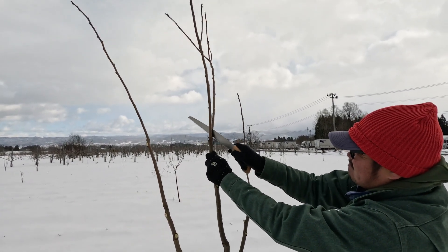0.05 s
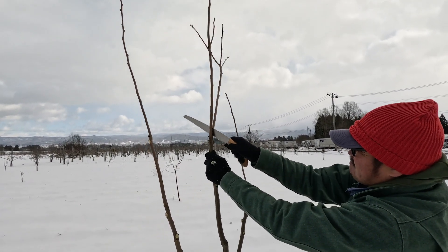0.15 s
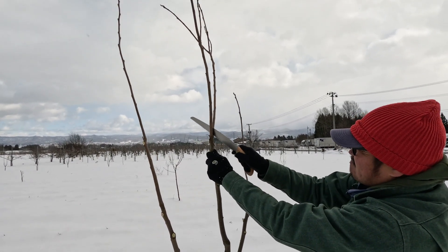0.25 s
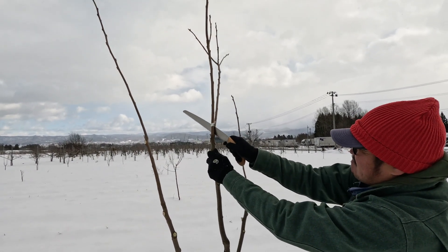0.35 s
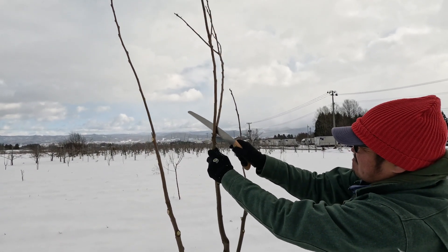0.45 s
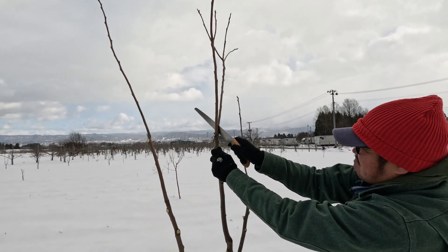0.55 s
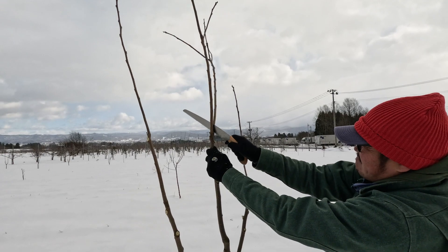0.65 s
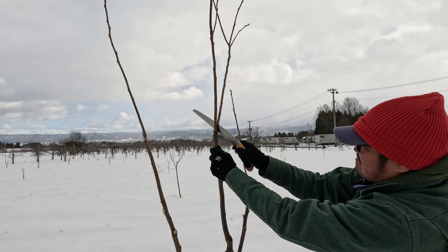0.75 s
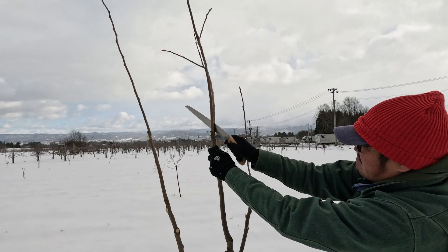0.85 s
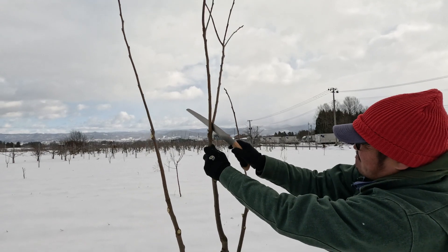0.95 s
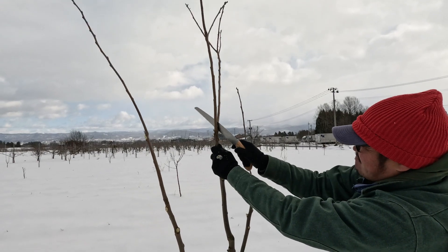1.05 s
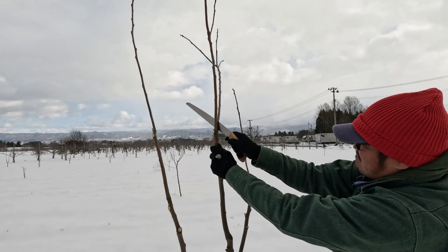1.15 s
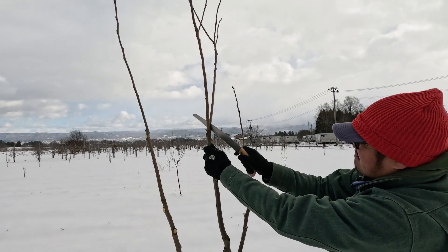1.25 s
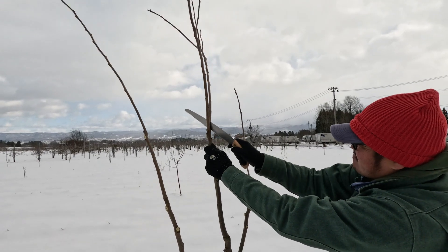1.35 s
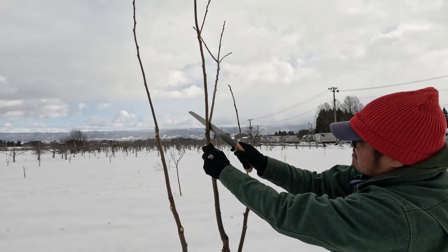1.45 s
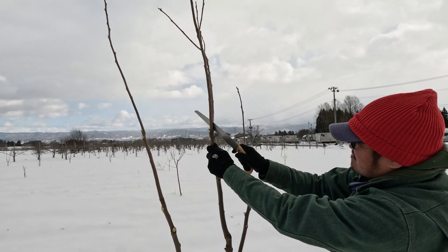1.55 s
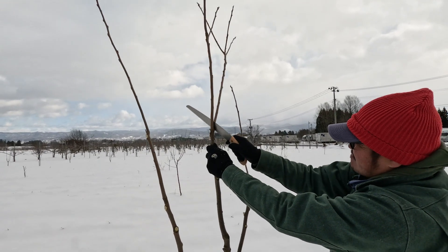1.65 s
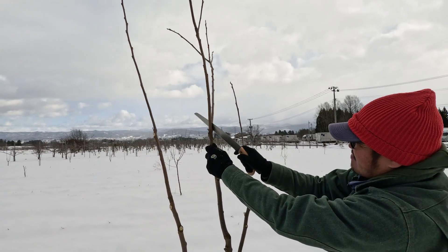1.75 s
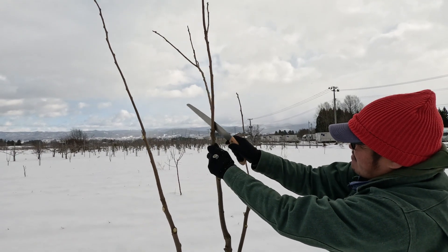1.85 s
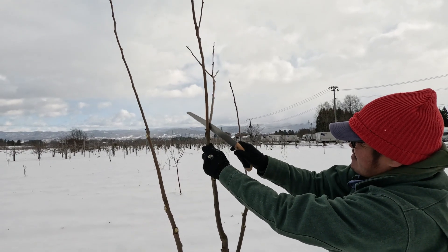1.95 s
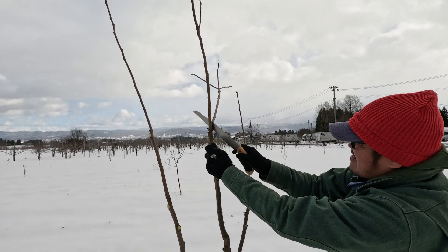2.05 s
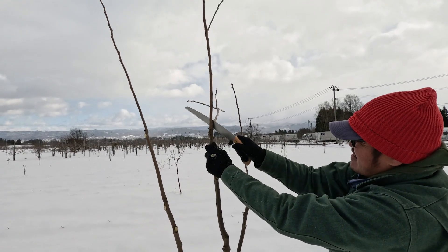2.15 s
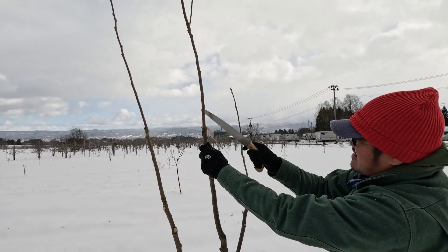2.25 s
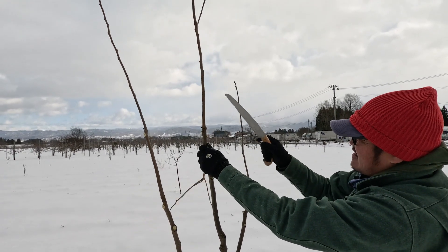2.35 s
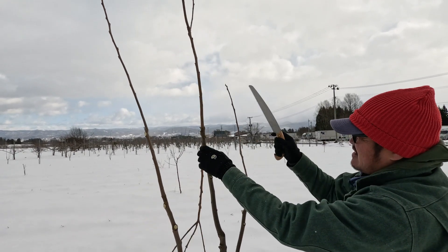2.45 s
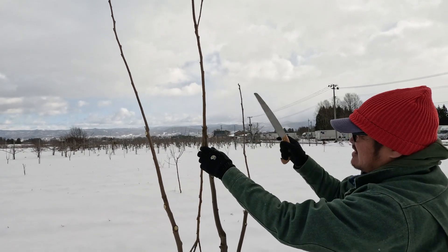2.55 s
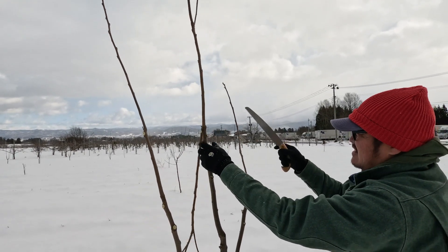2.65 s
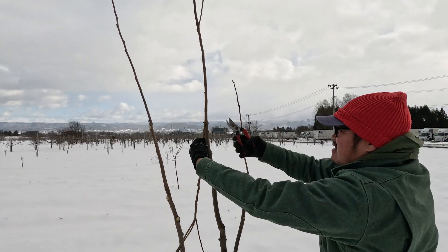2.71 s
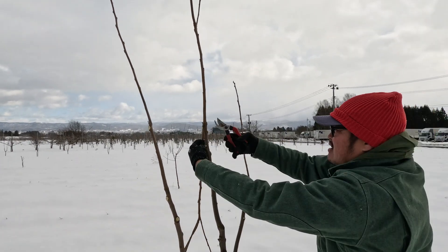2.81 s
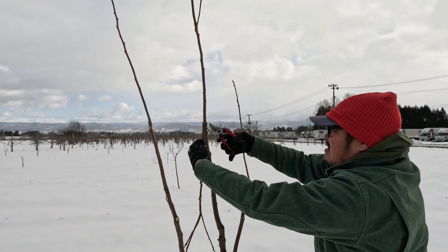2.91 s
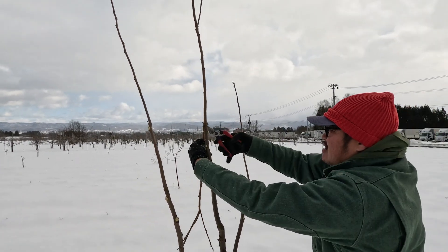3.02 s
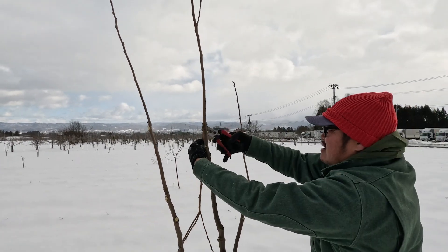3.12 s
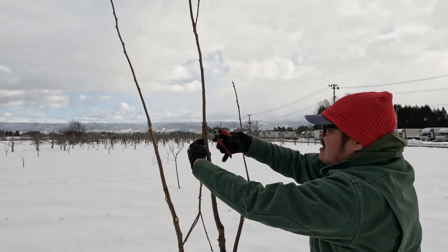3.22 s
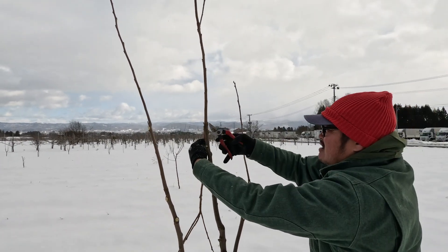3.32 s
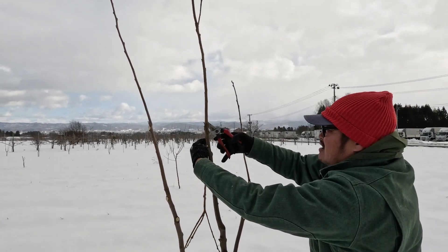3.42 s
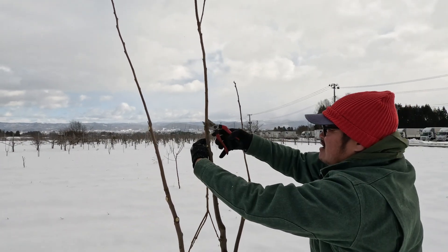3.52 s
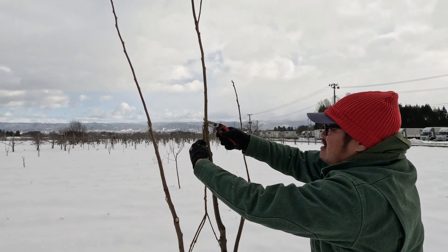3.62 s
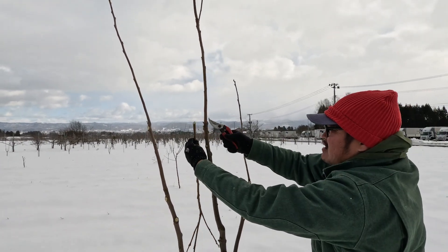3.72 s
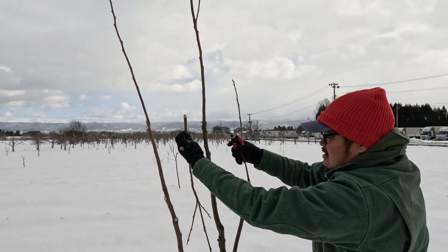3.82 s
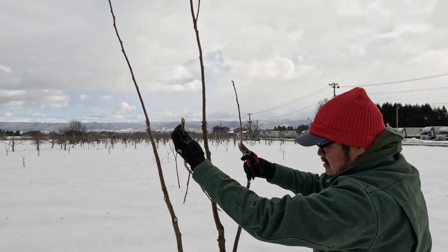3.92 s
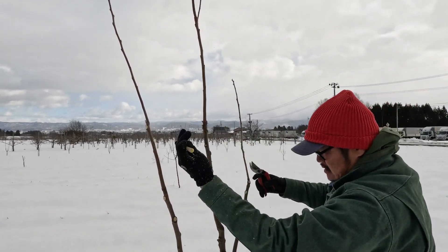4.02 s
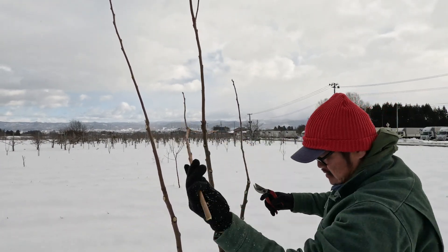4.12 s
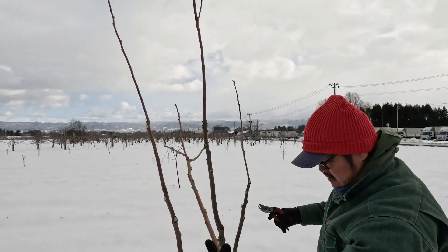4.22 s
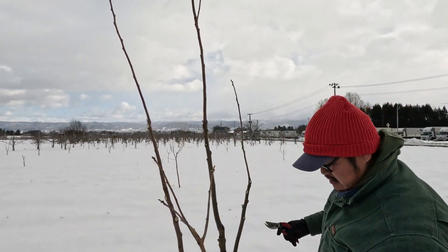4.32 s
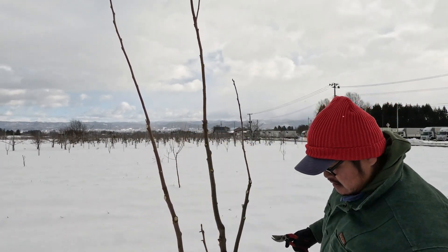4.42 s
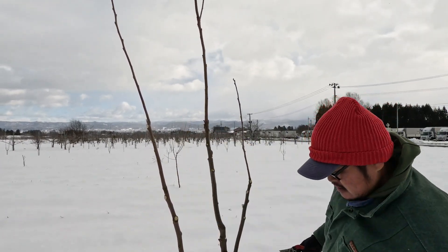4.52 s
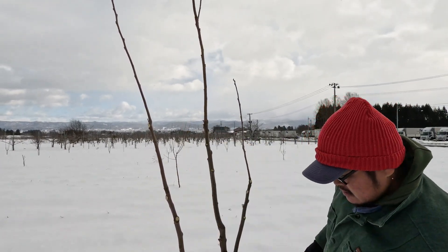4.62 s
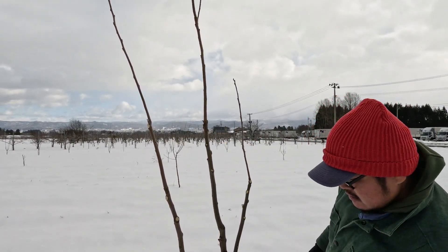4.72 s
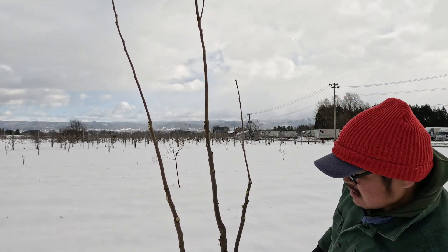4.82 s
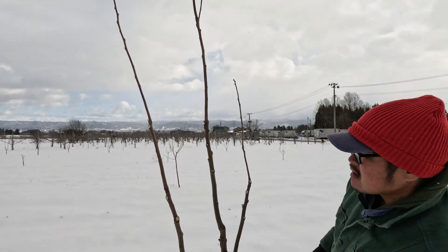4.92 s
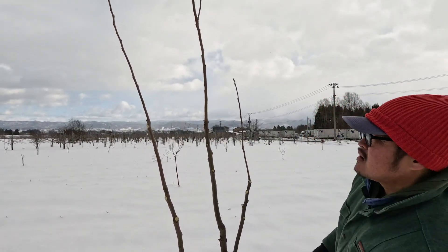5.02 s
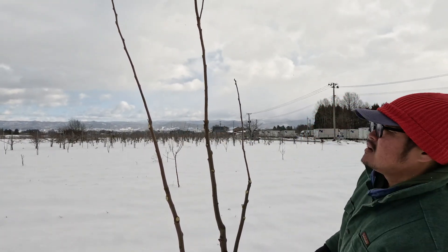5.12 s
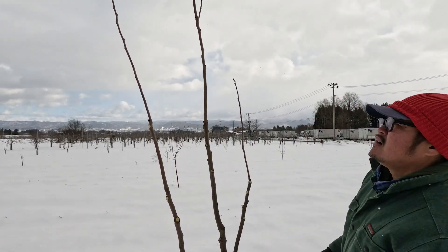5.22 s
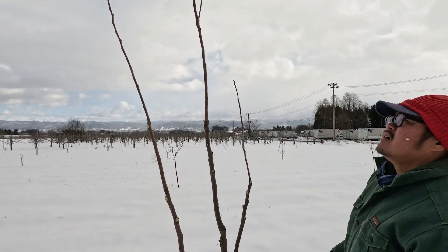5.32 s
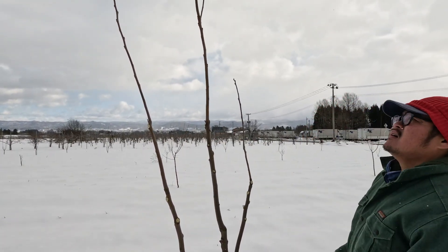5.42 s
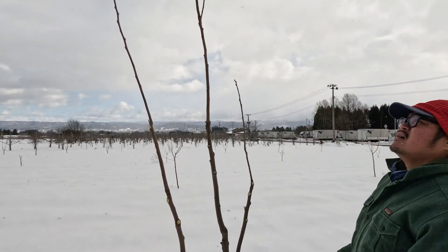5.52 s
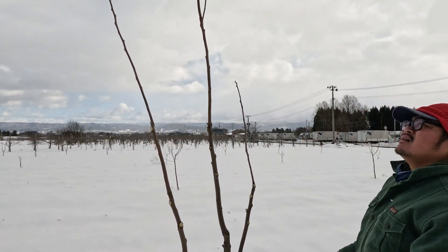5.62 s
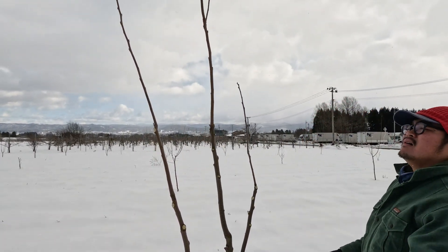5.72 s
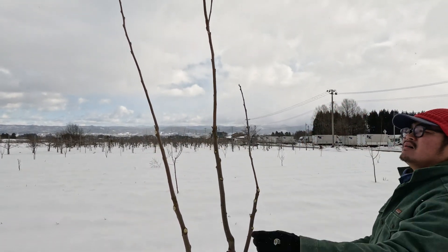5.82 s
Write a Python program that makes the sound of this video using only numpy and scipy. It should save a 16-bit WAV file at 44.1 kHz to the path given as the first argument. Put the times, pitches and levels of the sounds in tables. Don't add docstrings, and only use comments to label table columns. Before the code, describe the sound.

Outdoors on a snowy field, a folding saw cuts a thin branch close to the microphone, eight rasping strokes a second, with small steel rings and low stem shudder. After it stops, a stiff jacket rustles softly, a very sharp twig crack sounds, then smaller snaps. Snow crunches and faintly creaks at the end. Low wind buffets the microphone over far traffic.

```python
import sys
import numpy as np
from scipy import signal
from scipy.io import wavfile
from scipy.ndimage import uniform_filter1d

SR = 44100
rng = np.random.default_rng(int(sys.argv[2]) if len(sys.argv) > 2 else 0)


def store_pcm(level_fs):
    pcm = np.round(np.clip(level_fs, -1, 1) * 32767).astype(np.int16)
    wavfile.write(sys.argv[1], SR, np.atleast_2d(pcm).T)


def gain_from_db(level_db):
    decades = np.asarray(level_db, float) / 20
    return 10 ** decades


N = 258409
T = np.arange(N) / SR


def evened(x):
    return x / np.sqrt(np.mean(x ** 2) + 1e-20)


def curve(rows):
    s, *columns = np.transpose(rows)
    return [np.interp(T, s, column) for column in columns]


def read(points, hz):
    f, value = np.transpose(points)
    return np.interp(np.log(hz + 1), np.log(f + 1), value)


def colour(x, points):
    hz = np.fft.rfftfreq(4096, 1 / SR) + 1
    below = np.maximum(points[0][0] / hz, 1)
    above = np.maximum(hz / points[-1][0], 1)
    db = read(points, hz) - 18 * np.log2(below * above ** 3)
    log = np.log(gain_from_db(np.maximum(db, -100)))
    log = np.r_[log, log[-2:0:-1]]
    taps = np.fft.ifft(np.exp(log - 1j * signal.hilbert(log).imag)).real[:2048]
    taps = (taps / np.linalg.norm(taps)).reshape((1,) * (x.ndim - 1) + (-1,))
    return signal.oaconvolve(x, taps, axes=-1)[..., :N]


def ring(x, hz, width):
    r = np.exp(-np.pi * width / SR)
    return 2 * signal.lfilter([1 - r], [1, -r * np.exp(2j * np.pi * hz / SR)], x).real


def resonate(x, hz, width):
    turn = np.exp(2j * np.pi * np.cumsum(hz * np.ones(N)) / SR)
    r = np.exp(-np.pi * width / SR)
    return 2 * (turn * signal.lfilter([1 - r], [1, -r], x / turn)).real


def drift(seconds):
    size = max(round(seconds * SR), 1)
    return evened(uniform_filter1d(uniform_filter1d(rng.standard_normal(N), size), size))


def grit(per_s, spread_db):
    size = gain_from_db(spread_db * np.minimum(rng.exponential(1, N), 4)) * rng.standard_normal(N)
    return evened(size * (rng.random(N) < per_s / SR))


def steadied(x, seconds):
    return x / np.sqrt(uniform_filter1d(x ** 2, max(round(seconds * SR), 2)) + 1e-12)


def mottled(x, patchy_db):
    z = signal.stft(x, nperseg=256)[2]
    patches = uniform_filter1d(rng.standard_normal(z.shape), 2, 0)
    patches = evened(uniform_filter1d(patches, 12, 1))
    return evened(signal.istft(z * gain_from_db(patchy_db * patches), nperseg=256)[1][:N])


def bumps(s, db, rise, fall):
    coarse = T[::32]
    late = coarse - s[:, None]
    shape = np.exp(-(late / np.where(late < 0, rise, fall)) ** 2)
    power = (gain_from_db(db)[:, None] ** 2 * shape).sum(0)
    return np.interp(T, coarse, np.sqrt(power))


def swells(rows, rest_db):
    s, db, half = np.transpose(rows)
    return np.hypot(gain_from_db(rest_db), bumps(s, db, half[:, None], half[:, None]))


def pair(x, other_db, seconds):
    side = gain_from_db(other_db) * x * drift(seconds)
    return np.array([x + side, x - side])


# (frequency [Hz], likeness [0-1])
LIKENESS = [(60, 0.81), (170, 0.92), (500, 0.71), (1440, 0.49), (4140, 0.61), (11900, 1)]


def spread(points, patchy_db, flicker_db):
    frames, hz = N // 128 + 5, np.fft.rfftfreq(512, 1 / SR)
    a, b, c, d, patches = rng.standard_normal((frames, 257, 5)).T
    patches = evened(uniform_filter1d(uniform_filter1d(patches, 6, 0), 20, 1))
    flicker = evened(uniform_filter1d(rng.standard_normal(frames), 4))
    same = np.clip(read(LIKENESS, hz), -1, 1)[:, None]
    left = a + 1j * b
    right = same * left + np.sqrt(1 - same ** 2) * (c + 1j * d)
    z = np.array([left, right]) * gain_from_db(patchy_db * patches + flicker_db * flicker)
    noise = signal.istft(z, nperseg=512, noverlap=384)[1][:, :N]
    return evened(colour(noise, points))


# (frequency [Hz], level per Hz [dB])
ROAD_TONE = [(24, -35.5), (40, 1), (118, -15), (295, -9), (429, -30.5), (583, -21.5), (810, -32),
             (1050, -21.5), (1270, -29.5), (2690, -74), (7040, -36.5), (8900, -44.5), (11000, -93.5),
             (14300, -107), (22000, -120)]


def road():
    return gain_from_db(-54.5) * spread(ROAD_TONE, 1.7, 0.34)


# (time [s], level [dB])
WIND_PRESSURE = [(0.0, -46.5), (0.88, -42.5), (1.03, -47.5), (1.22, -40), (1.89, -49), (1.97, -50),
                 (3.16, -47.5), (3.41, -42), (3.54, -46), (3.74, -37), (4.31, -40.5), (4.49, -47),
                 (4.54, -37.5), (4.88, -47), (4.99, -37), (5.24, -55.5), (5.58, -37), (5.86, -38.5)]
# (time [s], level [dB], half length [s])
EDDIES = [(0.0, -53, 0.015), (0.55, -63, 0.046), (0.92, -55.5, .12), (1.33, -51, 0.075),
          (1.65, -47.5, 0.24), (3.28, -53, 0.08), (3.57, -52.5, 0.1), (3.78, -47, 0.054),
          (4.48, -50.5, 0.11), (4.86, -52.5, 0.15), (5.23, -50, 0.14), (5.67, -44, 0.051),
          (5.8, -43.5, 0.054)]
# (time [s], level [dB], frequency [Hz])
GUST_THUMPS = [(4.289, -31.5, 49), (4.528, -36, 59), (5.23, -39, 200), (5.565, -33, 14.5),
               (5.602, -28, 122), (5.609, -26, 56), (5.639, -32, 47), (5.678, -35, 104), (5.75, -30.5, 86),
               (5.791, -38, 38), (5.809, -29.5, 55), (3.738, -26, 180)]


def wind():
    buffet_db, = curve(WIND_PRESSURE)
    buffet = spread([(8, -7.5), (22, 11), (40, -5.0), (70, -25.5)], 0, 0.97)
    buffet = gain_from_db(buffet_db) * buffet * gain_from_db([[-1.2], [1.2]])
    flutter = spread([(45, -3.5), (70, -4), (140, -8.0), (320, -15.0), (700, -25.0)], 3.9, 1.1)
    flutter = swells(EDDIES, -73.5) * flutter
    thumps = np.zeros(N)
    for s, db, hz in GUST_THUMPS:
        late = T - s
        thumps += gain_from_db(db) * np.sin(2 * np.pi * hz * late) * np.exp(-(late * hz - .5) ** 2 * 3)
    return buffet + flutter + thumps


# (time [s], level [dB])
SLEEVE_MOVES = [
    (0, -51),
    (.5, -51.5),
    (.6, -61.5),
    (.75, -55.5),
    (1.15, -61),
    (1.25, -52),
    (2.3, -51.5),
]
# (time [s], level [dB])
JACKET_MOVES = [(2.3, -42), (2.34, -70), (2.47, -59.5), (2.72, -67.5), (2.89, -62), (3.1, -69.5),
                (3.41, -73), (3.62, -79), (3.78, -85.5), (4.04, -57), (4.6, -58), (4.72, -70.5), (4.9, -61),
                (5.14, -56.5), (5.44, -55.5), (5.48, -66), (5.68, -63.5), (5.78, -64.5)]
# (frequency [Hz], level per Hz [dB])
CLOTH_TONE = [(880, -13.5), (1500, -2), (2480, -4), (3810, -4.5), (5440, -5), (8620, -15.5), (9910, -12),
              (11200, -40.5), (12000, -36.5), (15600, -70), (22000, -120)]


def jacket():
    sleeve_db, = curve(SLEEVE_MOVES)
    jacket_db, = curve(JACKET_MOVES)
    move_db = np.where(T < JACKET_MOVES[0][0], sleeve_db, jacket_db)
    return gain_from_db(move_db) * spread(CLOTH_TONE, 1.6, 1.2)


# (time [s], level [dB], half length [s])
WEIGHT_SHIFTS = [(2.33, -60, 0.079), (2.85, -60, 0.13), (3.28, -60, 0.3), (3.62, -61, 0.12),
                 (4.2, -59, 0.39), (4.55, -56.5, 0.14), (4.87, -59, 0.16), (5.13, -54, 0.14),
                 (5.28, -49.5, 0.085), (5.45, -56, 0.39), (5.79, -51, 0.086)]
# (frequency [Hz], level per Hz [dB])
SNOW_TONE = [(190, -21), (330, 4.5), (399, -3), (604, 0), (846, -6.5), (1220, 0), (1430, -5), (1660, -5.5),
             (2600, -28.5), (3380, -76), (5720, -120)]


def snow():
    return swells(WEIGHT_SHIFTS, -67) * gain_from_db(-1.5) * spread(SNOW_TONE, 2.1, 1.2)


# (time [s], length [s], bite level [dB], place of hardest bite [0-1], blade shimmer against bite [dB])
SAW_STROKES = [(0.011, 0.11, -32, 0.56, -52), (0.153, 0.11, -31.5, 0.49, -15),
               (0.274, 0.11, -33.5, .36, -48.5), (0.417, 0.091, -33, 0.31, -20),
               (0.52, 0.046, -34, 0.7, -18), (0.671, 0.065, -37, 0.58, -24),
               (0.768, 0.074, -32.5, 0.58, -35), (0.931, 0.082, -33.5, 0.52, -19.5),
               (1.04, 0.066, -33.5, .48, -38.5), (1.184, 0.12, -35.5, 0.33, -7),
               (1.302, 0.089, -28.5, 0.54, -16), (1.431, 0.098, -34.5, 0.58, -12.5),
               (1.55, 0.11, -35.5, .48, -24), (1.661, 0.12, -35.5, 0.4, -7), (1.788, 0.1, -30.5, 0.47, -47),
               (1.908, 0.11, -31, 0.43, -7.5), (2.029, 0.11, -30, .56, -22.5),
               (2.148, 0.13, -37.5, 0.65, -45), (2.277, 0.041, -36, 0.65, -41)]


def strokes():
    drag_db = -69
    arch_db = 52
    land_db, lift_db = 17, 19
    bite = np.full(N, gain_from_db(drag_db)) * (T < SAW_STROKES[-1][0])
    for s, length, db, top, _ in SAW_STROKES:
        way = (T - s) / length
        ends_db = np.interp(way, [-.03, .14, .86, 1.04], [land_db, 0, 0, lift_db])
        arch = arch_db * (np.clip(way, .14, .86) - top) ** 2
        bite += gain_from_db(db - arch - ends_db) * (way > -.03) * (way < 1.04)
    return bite


# (time [s], bite level [dB], fall [s])
TOOTH_GRABS = [(.032, -41.5, .012), (.143, -45.5, 0.0049), (0.175, -35, .015), (0.199, -33.5, 0.0047),
               (0.321, -34, 0.0042), (.375, -40.5, 0.014), (0.421, -32.5, 0.0055), (.443, -32.5, 0.0059),
               (.47, -35.5, 0.013), (.558, -33, 0.0065), (0.576, -46, .012), (.685, -42, .01),
               (.713, -35, 0.0065), (0.768, -45, 0.0083), (0.804, -35, 0.0044), (.84, -38.5, .012),
               (0.931, -46, 0.0039), (.947, -39, 0.0064), (1.047, -39, 0.0097), (1.089, -34, 0.0072),
               (1.161, -46, 0.0048), (1.178, -46.5, 0.0056), (1.197, -39, 0.0077), (1.307, -39.5, .01),
               (1.329, -33, 0.0064), (1.351, -26, 0.0054), (1.401, -46.5, .012), (1.569, -41, 0.0099),
               (1.668, -40, .006), (1.792, -41.5, 0.0096), (1.86, -29, 0.0049), (1.918, -39, 0.011),
               (1.95, -31.5, 0.0063), (2.034, -42, 0.011), (2.103, -27.5, 0.0063), (2.185, -36.5, 0.0081),
               (2.255, -36.5, 0.0058), (2.299, -34.5, 0.0053), (2.313, -35.5, 0.009), (2.334, -52.5, 0.014)]


def teeth_bite():
    s, grab_db, fall = np.transpose(TOOTH_GRABS)
    return np.hypot(strokes(), bumps(s, grab_db, .002, fall[:, None]))


def torn_fibres(bite):
    teeth_per_s = 420
    speed = np.clip(bite / gain_from_db(-33), .1, 2) ** 0.27
    turns = np.cumsum(teeth_per_s * speed * (1 + .25 * drift(0.0032))) / SR
    tooth = .35 + np.exp(-(turns % 1) / .28) * gain_from_db(2.6 * drift(.0035))
    tear = tooth * (rng.standard_normal(N) + .07 * grit(1500, 1.5))
    return steadied(mottled(tear, 3.8), .024)


# (frequency [Hz], level [dB], time to fall 60 dB [s])
BLADE_TONES = [(1610, -15, .04), (2620, -19, .03), (3750, -13, .06), (4240, -17, .025), (4800, -16, .03),
               (5390, -15, .03), (6010, -17, .03), (6890, -17, .025), (9875, -7, .045), (10500, -12, .03),
               (11190, -13, .03)]


def blade(drive, catch_s, pull):
    low_db = np.where(pull, -13.5, -12)
    high_db = np.transpose(SAW_STROKES)[-1]
    steel = 0
    for hz, db, t60 in BLADE_TONES:
        grip_db = np.interp(T, catch_s, low_db if hz < 8000 else high_db) + 10.0
        grip_db += 6.0 * np.tanh(drift(.05))
        tone = ring(drive * gain_from_db(grip_db), hz, 2.6 / t60)
        steel = steel + gain_from_db(db) * tone * np.sqrt(t60 * SR / 7)
    return steel


# (frequency [Hz], level per Hz [dB])
THUD_TONE = [(250, 1), (500, -8), (800, -6.5), (1050, 1), (1400, -9.5), (2000, -6.5), (3000, -25.5)]


def branch_thud(tear, catch_s, thud_db):
    catches = steadied(.4 * grit(200, 2.5) + tear, .03)
    return colour(catches * bumps(catch_s, thud_db, 0.017, 0.013), THUD_TONE)


# (frequency [Hz], width [Hz], level [dB])
STEM_TONES = [(57.3, 12, 6.5), (107, 47, -5), (161.7, 6.9, 0), (248, 3.9, -33.5), (282, 23, -40)]


def stem_shudder(catch_s, pull, stem_db):
    jolt = rng.standard_normal(N) + 0.32 * grit(60, 3.0)
    shake = evened(sum(gain_from_db(db) * ring(jolt, hz, width) for hz, width, db in STEM_TONES))
    delay_s = np.where(pull, 0.0014, 0.0012)
    return shake * bumps(catch_s + delay_s, stem_db, 0.025, 0.041)


# (time [s], wood thud level [dB], stem shudder level [dB])
STROKE_CATCHES = [(0.085, -38, -38.5), (0.189, -47.5, -33), (0.346, -31, -35.5), (0.464, -46, -43),
                  (0.557, -41, -38.5), (0.717, -48.5, -50.5), (0.83, -34.5, -41), (0.973, -43.5, -52),
                  (1.093, -37.5, -37.5), (1.234, -50, -46.5), (1.388, -40, -36), (1.469, -51.5, -45.5),
                  (1.609, -41, -37.5), (1.749, -48.5, -42.5), (1.868, -36.5, -38.5), (1.964, -44, -39.5),
                  (2.104, -39.5, -35), (2.229, -58.5, -42), (2.314, -49, -51.5)]
# (frequency [Hz], level per Hz [dB])
RASP_TONE = [(700, -26.5), (1200, -10), (2000, -6), (3400, -3.5), (5400, -3.5), (7000, -6), (7800, -11),
             (8700, -15), (9300, -13), (10000, -2.5), (10800, -9), (11400, -15.5), (12000, -36),
             (12600, -34.5)]


def saw():
    catch_s, thud_db, stem_db = np.transpose(STROKE_CATCHES)
    pull = np.arange(len(catch_s)) % 2 == 0
    bite = teeth_bite()
    tear = torn_fibres(bite)
    drive = tear * bite * gain_from_db(-2.5)
    rasp = colour(drive + gain_from_db(-5.5) * blade(drive, catch_s, pull), RASP_TONE)
    thud = branch_thud(tear, catch_s, thud_db)
    stem = stem_shudder(catch_s, pull, stem_db)
    return pair(rasp + thud, -9.5, 0.012) + pair(stem, -43.5, 0.057)


# (time [s], frequency [Hz], level [dB], time to fall 60 dB [s])
FREE_RINGS = [(.07, 3750, -30, .22), (.168, 3750, -34, .16), (.298, 3750, -36, .12), (.325, 3750, -32, .25),
              (.422, 3720, -38, .3), (.555, 3750, -35, .05), (.8, 3750, -36, .1), (.828, 3700, -34, .08),
              (1.335, 3750, -33, .15), (1.61, 3750, -38, .1), (1.945, 3750, -33, .2),
              (2.185, 3750, -39, .1), (2.228, 3750, -37, .15), (.197, 6050, -34, .03),
              (.474, 4950, -38, .08), (.927, 5600, -41, .05), (2.09, 5390, -33, .1), (.21, 9875, -36, .08),
              (.552, 9875, -39, .14), (1.07, 9875, -36, .09), (1.328, 9875, -31, .22),
              (1.497, 9875, -38, .1), (1.565, 9875, -41, .2), (1.81, 9875, -39, .2), (2.08, 9875, -35, .2),
              (2.25, 9875, -41, .08), (5.2296, 3000, -22, .012), (5.2296, 1500, -26, .015),
              (.585, 1260, -53, .6), (1.158, 3900, -46, .05), (1.28, 1250, -52, .3), (1.82, 3750, -31, .27),
              (1.858, 4800, -33, .05), (2.075, 3750, -33, .2), (2.3, 3750, -40, .25),
              (2.298, 4800, -33, .15), (2.305, 5390, -40, .1), (2.3, 8100, -42, .08), (2.31, 6700, -42, .1),
              (2.305, 9875, -45, .15), (3.7386, 3800, -12, .01), (2.697, 1480, -44, .09),
              (3.198, 2350, -61, .07), (3.586, 3250, -59, .08), (3.7386, 2000, -10, .012),
              (3.7386, 7000, -12, .012)]


def plinks():
    out, waver = np.zeros(N), .22 * drift(.004)
    for s, hz, db, t60 in FREE_RINGS:
        span = slice(round(s * SR), round((s + t60) * SR))
        late = np.maximum(T[span] - s, 0)
        swell = gain_from_db(db - 60 * late / t60) * np.minimum(late / (t60 / 40), 1)
        out[span] += swell * np.sin(2 * np.pi * hz * late + waver[span])
    return pair(out * gain_from_db(1.5 * drift(0.01)), -10.5, .004)


# (time [s], break level [dB], treble against body [dB],
# crackle length [s], crackle against break [dB])
TWIG_SNAPS = [(2.694, -36.5, -6.5, 0.023, 2.5), (3.7045, -25, -5.5, 0.014, -5.5),
              (3.723, -40, -25, 0.0092, 6), (3.7297, -17.5, 4, 0.01, -3.5),
              (3.7394, -11.5, -3.5, 0.0045, 2), (3.745, -9.5, -14, 0.0023, -4.5),
              (4.2702, -32.5, -9.5, 0.023, 7.5), (4.37, -38.5, 1, 0.0056, 4),
              (4.4108, -21.5, -4, 0.0047, -14.5), (4.418, -35, -5, 0.015, 3),
              (4.4275, -28.5, -7, 0.015, -7), (4.443, -35.5, -0.5, 0.013, 1.5), (4.46, -44, -6, 0.017, 2),
              (4.476, -40, -15, .004, -4), (4.487, -44, -13, .004, -4), (5.189, -34.5, -23, 0.056, -8),
              (5.2292, -21, -13, 0.0033, -1), (5.2324, -26.5, -9, 0.027, 0.5),
              (5.236, -27.5, -11, 0.0035, -6), (5.243, -25, -2.5, 0.0033, -1),
              (5.2483, -30, -4, 0.0044, -2), (5.263, -40, -8, .006, -4), (5.256, -37.5, -3.5, 0.036, 2)]
# (time [s], level [dB], treble against body [dB], length [s])
TWIG_BRUSHES = [(2.666, -64, 9, 0.01), (2.772, -49, 0, 0.11), (3.045, -65.5, 12, 0.02),
                (3.146, -58, -4, 0.006), (3.202, -56.5, -1, 0.006), (3.325, -55, -13, 0.015),
                (3.585, -58, 4.5, 0.039), (3.649, -59, 3, 0.095), (3.766, -43.5, -2.5, 0.029),
                (3.806, -49, -4, 0.0071), (4.018, -60.5, 14, 0.044), (4.19, -47.5, -25, 0.016),
                (4.385, -42, -1, 0.03), (5.167, -38.5, -28, 0.021), (5.353, -61, 12, .012),
                (5.697, -61, 7, 0.0072)]
# (frequency [Hz], level per Hz [dB])
TWIG_BODY = [(400, -12), (850, -13.5), (1250, 0), (2000, -0.5), (2800, -5.5), (3700, -4.5), (4100, -7.5),
             (4500, -29.5), (6000, -25.5)]
# (frequency [Hz], level per Hz [dB])
TWIG_TREBLE = [(3600, -12.5), (4600, -25.5), (5000, -5), (5800, -8.5), (7100, -10.5), (8700, -18),
               (10300, -16.5), (11300, -26), (12000, -30), (14000, -60)]


def twigs():
    body, top = np.zeros((2, N)), np.zeros((2, N))
    t = np.arange(6000) / SR
    brushes = [(*row, 0) for row in TWIG_BRUSHES]
    for s, db, treble_db, length, crackle_db in TWIG_SNAPS + brushes:
        pan_db = -1.5 + 4 * rng.standard_normal()
        chance, pick = rng.standard_normal(len(t)), rng.random(len(t))
        crack = chance * gain_from_db(-60 * t / .006)
        fibres = chance * (0.47 + 1.6 * (pick < .04))
        crackle = gain_from_db(crackle_db) * np.exp(-(t / length) ** 3.4) * fibres
        sound = gain_from_db(db + np.array([[pan_db], [-pan_db]]) / 2) * (crack + crackle)
        k = round(s * SR)
        body[:, k:k + len(t)] += sound[:, :N - k]
        top[:, k:k + len(t)] += gain_from_db(treble_db) * sound[:, :N - k]
    out = colour(body, TWIG_BODY) + colour(top, TWIG_TREBLE)
    return gain_from_db(-7.0) * out * (1 + gain_from_db(-11.5) * drift(0.0021) * [[1], [-1]])


# (time [s], frequency [Hz], level [dB])
SNOW_CREAK = [
    (5.64, 1330, -64),
    (5.672, 1210, -55),
    (5.7, 1180, -58),
    (5.73, 1130, -59),
    (5.745, 1120, -68),
]


def boot_creak():
    hz, db = curve(SNOW_CREAK)
    on = (T > SNOW_CREAK[0][0]) & (T < SNOW_CREAK[-1][0])
    return on * gain_from_db(db) * steadied(resonate(rng.standard_normal(N), hz, 14), .02)


# (time [s], frequency [Hz], level [dB], octave level [dB])
BOOT_SQUEAK = [
    (5.776, 2716, -74, -85),
    (5.782, 2600, -65, -80),
    (5.79, 2515, -60, -68),
    (5.798, 2487, -58, -61),
    (5.812, 2445, -65, -58),
    (5.826, 2480, -59, -58),
    (5.84, 2535, -54, -57),
    (5.85, 2490, -57, -61),
    (5.859, 2480, -59, -64),
]


def boot_squeak():
    hz, db, octave_db = curve(BOOT_SQUEAK)
    turn = 2 * np.pi * np.cumsum(hz * (1 + .004 * drift(.003))) / SR
    on = np.clip((T - BOOT_SQUEAK[0][0]) / 0.011, 0, 1) * gain_from_db(2.0 * drift(0.0037))
    return on * np.sqrt(2) * (gain_from_db(db) * np.sin(turn) + gain_from_db(octave_db) * np.sin(2 * turn))


def scene():
    air = road() + wind()
    body = jacket() + snow() + boot_creak() + boot_squeak()
    return air + body + saw() + plinks() + twigs()


# (frequency [Hz], level per spectrum line [dB])
FAINTEST_KEPT = [(3000, -112), (7000, -107), (8300, -96), (10500, -105), (11500, -89.5), (12500, -93)]


def without_hidden(x):
    hz, t, z = signal.stft(x, SR, nperseg=2048, noverlap=1024)
    power = abs(z) ** 2
    band_db = 10 * np.log10(uniform_filter1d(power, 12, 1).mean(0) + 1e-20)
    near_db = 10 * np.log10(uniform_filter1d(power, 180, 1).mean(0) + 1e-20)
    hiding_db = read([(2200, 27), (2600, 13), (6400, 13), (6600, 10)], hz)[:, None]
    limit_db = np.maximum(read(FAINTEST_KEPT, hz)[:, None], near_db - hiding_db)
    limit_db += 5.0 * evened(uniform_filter1d(rng.standard_normal(limit_db.shape), 12, 0))
    keep = np.clip((band_db - limit_db) / 3 + .5, 0, 1)
    z = z * np.where(hz[:, None] > 450, keep, 1)
    return signal.istft(z, SR, nperseg=2048, noverlap=1024)[1][:, :N]


# (time [s], length [s], lowest frequency lost [Hz])
TREBLE_GAPS = [(.41, .007, 7500), (.922, .006, 6500), (1.03, .012, 7000), (1.156, .008, 9000),
               (1.168, .02, 7500), (1.645, .008, 8000), (1.657, .009, 3500), (3.695, .009, 7500),
               (3.718, .007, 7000), (3.751, .006, 1500), (4.25, .018, 7500), (4.357, .01, 6500),
               (4.376, .007, 7000), (4.39, .004, 6500), (4.403, .004, 5500), (4.413, .005, 7000),
               (5.21, .012, 7000)]


def with_gaps(x):
    hz, t, z = signal.stft(x, SR, nperseg=128)
    gap = sum((hz[:, None] > above_hz) & (t > s) & (t < s + length) for s, length, above_hz in TREBLE_GAPS)
    return signal.istft(z * np.where(gap > 0, .03, 1), SR, nperseg=128)[1][:, :N]


def top_cut(x):
    return signal.sosfilt(signal.butter(12, 12530, fs=SR, output="sos"), x)


def record(dry):
    peak = .95
    mix = with_gaps(without_hidden(dry))
    return top_cut(peak * np.tanh(mix / peak))


dry = scene()
out = record(dry)
store_pcm(out)
```